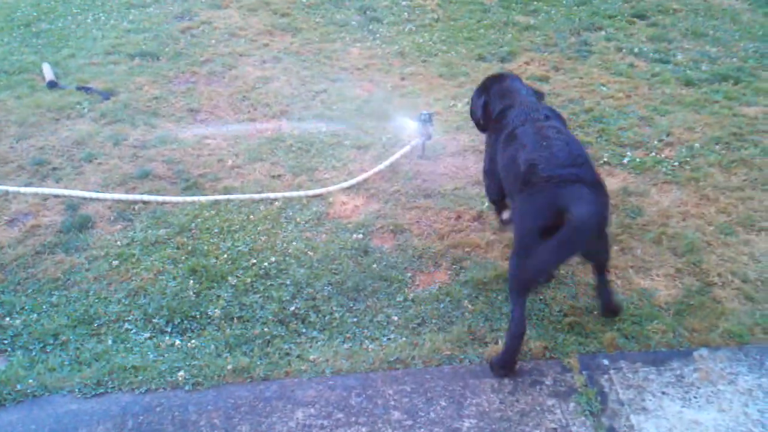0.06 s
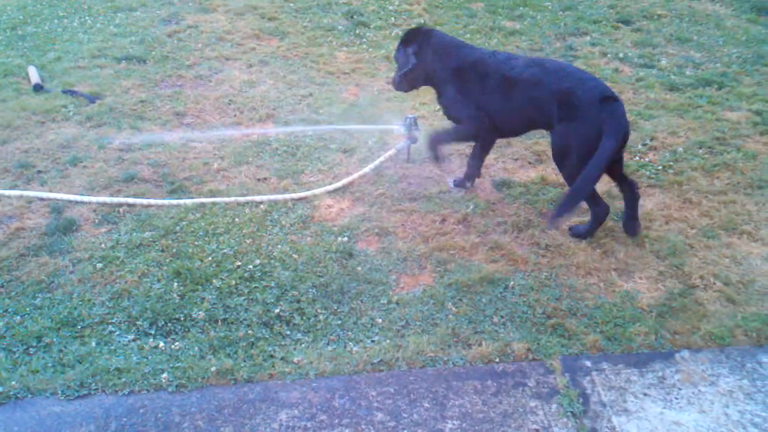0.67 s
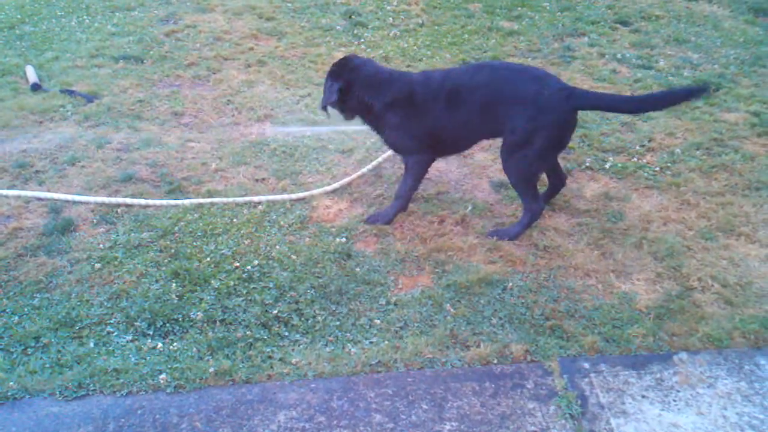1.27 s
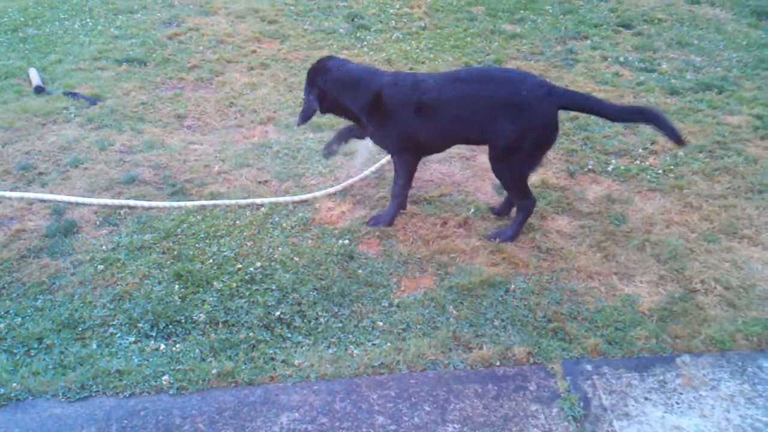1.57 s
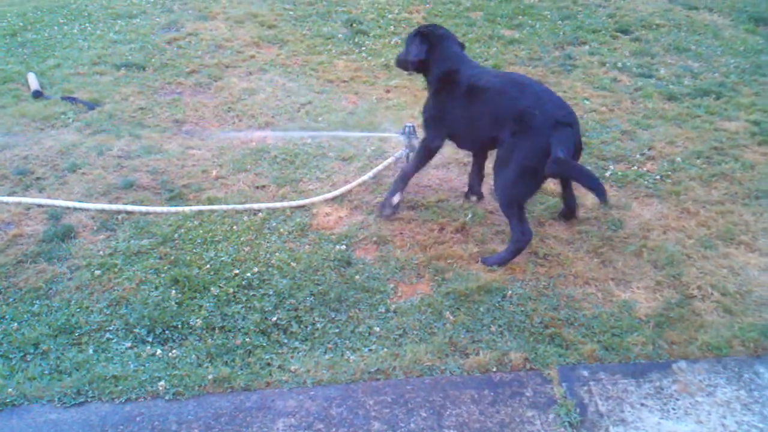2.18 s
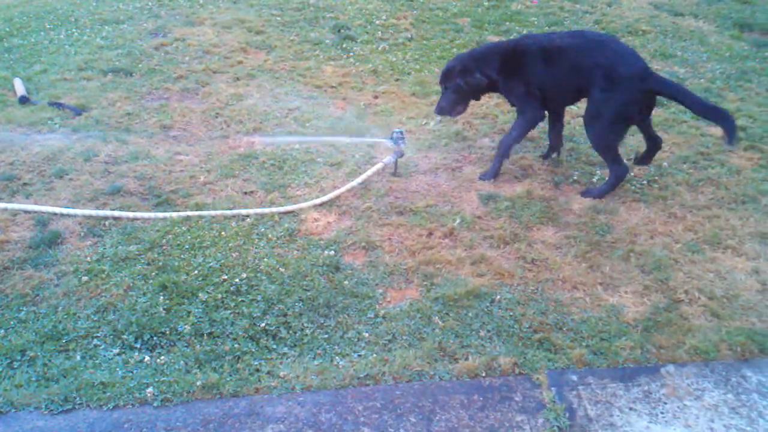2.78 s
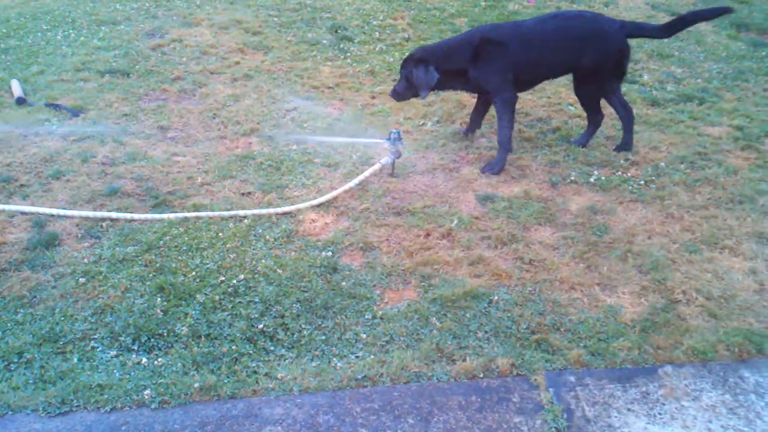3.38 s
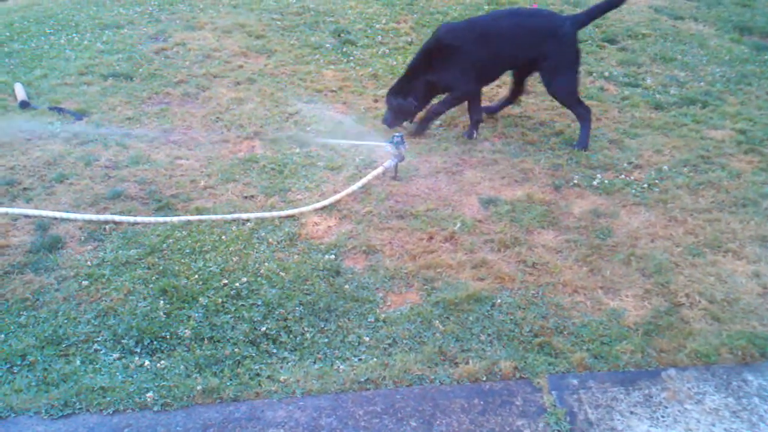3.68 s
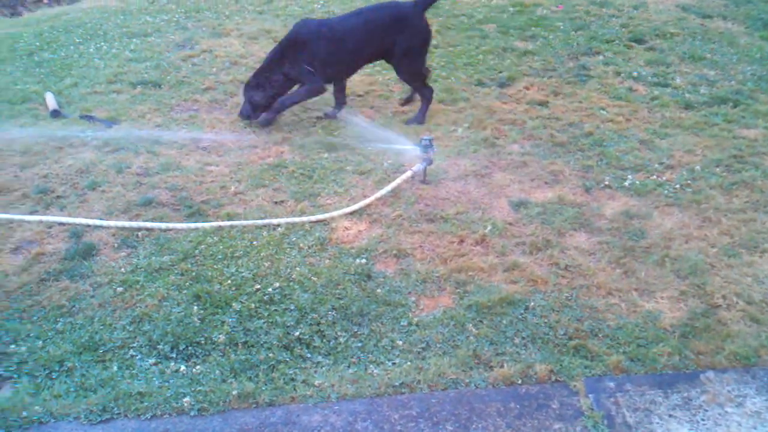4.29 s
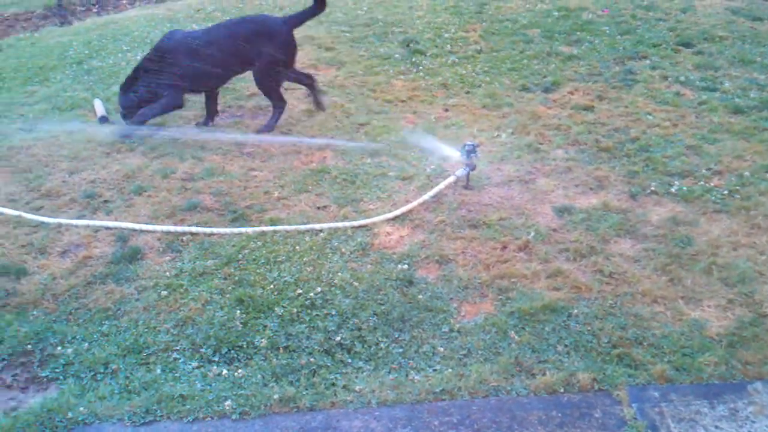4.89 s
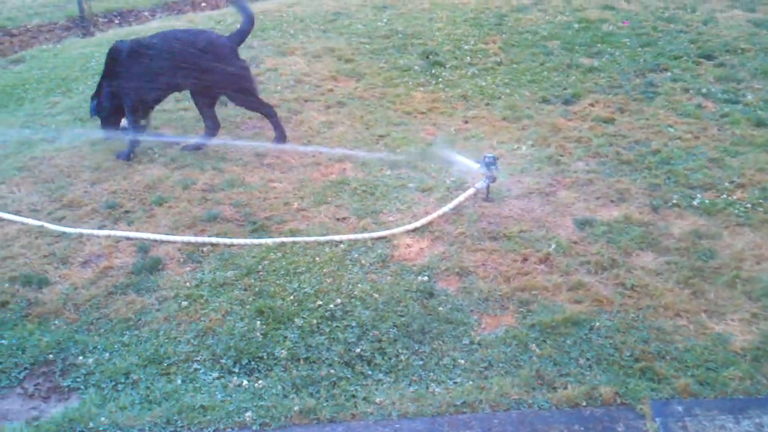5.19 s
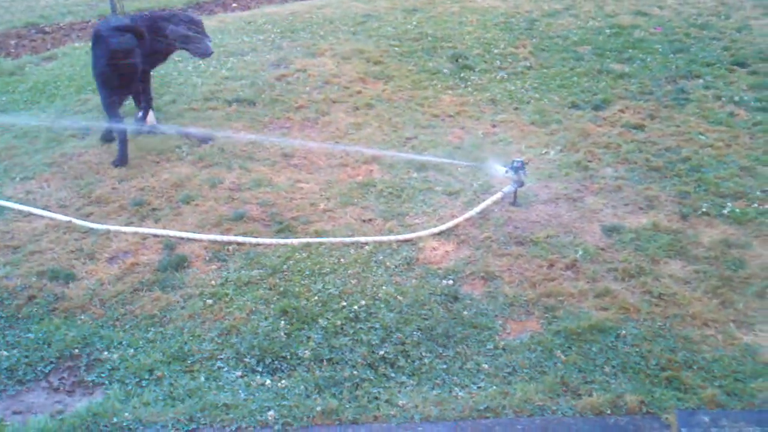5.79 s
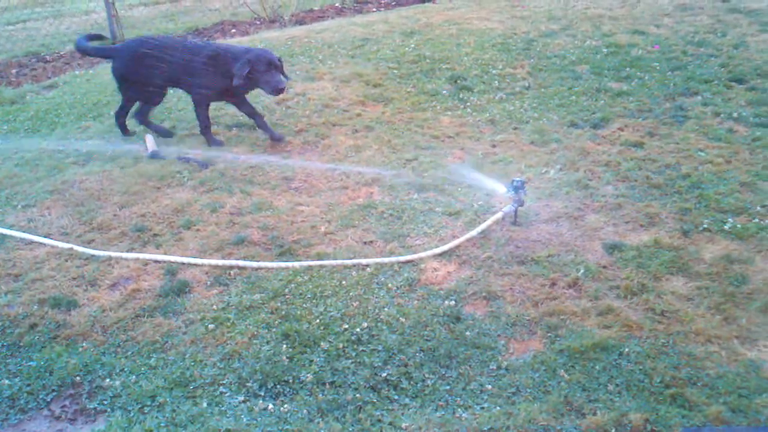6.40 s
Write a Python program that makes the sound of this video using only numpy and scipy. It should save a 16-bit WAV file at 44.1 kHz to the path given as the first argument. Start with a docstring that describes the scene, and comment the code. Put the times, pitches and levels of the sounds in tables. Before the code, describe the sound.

An impact sprinkler ticks on a lawn throughout, each tick a dry click with a slight metallic ring and a short, bright spurt of spray. It starts at about ten ticks a second and slows to a steady six and a half by 2 seconds. At 0.9 seconds the jet splashes briefly on a dog, and again faintly at 1.6, each time skipping a tick. The ticking is softer from about 1 to 2.3 seconds, then gradually regains strength. Wind, louder than the sprinkler, buffets the microphone with low, crackling thumps at the start, heavily from 1 to 2.5 seconds, and again around 3.6. A dull thump comes at 2.9. After 4.5 seconds the wind is gone and the sprinkler is clear, with a few small drop ticks around 5.6 to 5.9. Underneath lie a fine water hiss, faint low outdoor background noise and occasional handling rumble.

```python
"""An impact sprinkler ticks on a lawn: its arm swings into the water jet, clicks, rings the metal head
and throws out a short spray, fast at first, then slowing to a steady 6.5 times a second.
A dog blocks the jet twice, with a paw and with its mouth. The jet hisses, a few fat drops land and
the garden murmurs far away. Wind gusts buffet a hand-held camera, whose two close microphones (mics)
are subtracted from each other to make the stereo sound wider."""
import sys
import numpy as np
from scipy import signal
from scipy.fft import rfft, irfft
from scipy.io import wavfile
from scipy.ndimage import uniform_filter1d, map_coordinates

SR = 44100
rng = np.random.default_rng(int(sys.argv[2]) if len(sys.argv) > 2 else 0)


def unload_audio(sound):
    """Save the sound as a 16-bit wav file, at the path given as the first command line argument."""
    columns = np.transpose(np.atleast_2d(sound))
    # keep every value between -1 and 1, then stretch to whole-number steps
    steps = np.round(np.clip(columns, -1, 1) * 32767)
    wavfile.write(sys.argv[1], SR, steps.astype(np.int16))


N = 293265
TIME = np.arange(N) / SR

# A COLOUR table only says how strong low and high pitches are compared with each other.
# the far-off murmur of the garden: f/Hz, level/dB
GARDEN_COLOUR = [(60, 9), (130, 13), (250, 9.5), (400, 0.5), (800, -2), (1300, -13), (2000, -34),
                 (3500, -30), (6000, -34)]
# how loud the murmur is heard (it dips, swells near 2 s, dips again, then slowly rises): t/s, level/dB
GARDEN_LEVEL = [(0, -49), (.28, -50), (.55, -45.5), (1.06, -46.5), (1.2, -61), (1.8, -50), (2.13, -42.5),
                (2.6, -55.5), (3.3, -51), (3.68, -54), (4.2, -53), (5.1, -50.5), (5.85, -48.5),
                (6.65, -46.5)]
# the rumble of the camera body: f/Hz, level/dB
RUMBLE_COLOUR = [(20, -46), (45, 2.5), (100, 4), (150, 1.5), (300, -16.5), (1000, -54.5)]
# the hand shifts on the camera: peak t/s, level/dB, rise/s, fall/s (each over 10 dB)
HAND_SHIFTS = [(.08, -24, 0.12, 0.12), (.5, -39, 0.42, 0.31), (1.1, -29, 0.17, 0.22),
               (4.55, -44.5, 0.31, 0.15), (6.46, -40, 0.074, 0.13)]
# gusts of wind: peak t/s, strength/dB, rise/s, fall/s (each over 10 dB)
WIND_GUSTS = [(0, -23.5, .03, 0.032), (.1, -22.5, 0.073, 0.2), (.365, -34, 0.011, 0.038),
              (.58, -38, 0.051, 0.079), (.99, -25.5, 0.021, 0.011), (1.115, -19.5, 0.05, 0.027),
              (1.26, -21, 0.12, 0.11), (1.48, -23, 0.075, 0.15), (1.8, -19, 0.14, 0.48),
              (2.0, -15, 0.14, 0.31), (2.28, -21, 0.17, 0.23), (2.555, -19.5, 0.0081, 0.0069),
              (2.675, -25, 0.033, 0.02), (2.97, -31.5, 0.079, 0.032), (3.25, -40, 0.08, 0.15),
              (3.53, -21.5, 0.033, 0.054), (3.6, -15, 0.047, 0.038), (3.67, -17.5, 0.049, 0.047),
              (3.785, -22.5, 0.082, 0.057), (4.03, -30.5, 0.044, 0.034), (4.2, -34.5, 0.073, 0.1),
              (4.46, -34.5, 0.035, 0.064)]
# eddies (swirls of air), large to small: f/Hz, relative level/dB, growth/(dB per gust dB), rate/(1/s)
EDDY_SIZES = [(163, -4.5, 0.88, 600), (303, -3, 1.495, 650), (697, -20, 2.37, 260), (1200, -45, 2.3, 140)]
# single hard hits of wind: t/s, peak level/dB, f/Hz
WIND_HITS = [(.08, -4.5, 256), (.096, -12.5, 317), (.151, -2.5, 264), (.301, -25, 230), (.369, -19.5, 221),
             (.529, -20, 244), (.594, -20, 204), (.663, -29, 230), (.971, -20, 217), (1.021, -3, 221),
             (1.065, -10.5, 190), (1.099, 0, 262), (1.124, -2.5, 195), (1.133, -2.5, 273), (1.15, -9, 300),
             (1.206, -16, 533), (1.212, -11.5, 380), (1.294, -16.5, 640), (1.354, -15.5, 338),
             (1.416, -13, 263), (1.438, -15.5, 315), (1.481, -11, 266), (1.525, -11.5, 267),
             (1.701, -14, 380), (1.844, -6, 323), (1.857, -15, 557), (1.882, -2.5, 300), (1.901, -3, 288),
             (1.927, -22.5, 800), (1.937, -3.5, 293), (1.947, -12, 560), (1.967, -14, 780), (1.992, 0, 218),
             (2.004, -12, 800), (2.036, -6.5, 412), (2.054, -11, 540), (2.061, -7, 323), (2.069, -14, 750),
             (2.176, -8, 337), (2.184, -13.5, 704), (2.217, -15, 710), (2.229, -17, 300),
             (2.249, -17.5, 1170), (2.251, 0, 248), (2.291, -7, 393), (2.344, -10.5, 516),
             (2.405, -23, 547), (2.463, -14, 278), (2.544, -17.5, 322), (2.673, -21, 571),
             (2.972, -19.5, 249), (3.342, -17, 194), (3.525, -6.5, 310), (3.562, -12.5, 520),
             (3.587, -10, 700), (3.598, -2, 524), (3.627, -0.5, 392), (3.673, -16, 580), (3.722, -22, 516),
             (3.78, -22.5, 685), (3.804, -9, 260), (4.154, -20.5, 209), (4.247, -20, 216),
             (4.487, -24, 302)]
# a dull thump on one mic: t/s, level/dB, f/Hz, decay/s
DULL_THUMPS = [(2.888, -6.5, 147, 0.0028)]
# the hiss of the free jet: f/Hz, level/dB
JET_COLOUR = [(1500, 2.5), (2500, -6), (3700, -9.5), (5000, -7.5), (7000, 0.5), (9600, 3.5), (10500, 0),
              (12000, 4), (13900, -2)]
# how loud the jet hisses: t/s, level/dB
HISS_LEVEL = [(0, -48.5), (.55, -49.5), (1.06, -51.5), (1.2, -57), (1.75, -55.5), (2.4, -59.5),
              (3.1, -56.5), (3.45, -54), (3.7, -58), (4.2, -56.5), (4.65, -54.5), (5.0, -54.5), (5.72, -51),
              (6.2, -49), (6.65, -50)]
# fat drops landing nearby: t/s, level/dB, f/Hz
FAT_DROPS = [(5.592, -49, 3070), (5.718, -43, 6800), (5.854, -35, 3220)]
# water hitting the dog: f/Hz, level/dB
DOG_COLOUR = [(300, -11), (1000, -17), (2000, -12), (3500, -14), (5000, -7.5), (7400, -2), (9300, 7),
              (10500, -5), (12000, 2.5), (14000, -10)]
# the dog blocks the jet: t/s, level/dB, length/s, extra level of the first slap/dB
DOG_BLOCKS = [(0.88, -32.5, 0.11, 0.5), (1.554, -45, 0.15, -5)]
# the notes of the metal head: f/Hz, level next to the spray/dB, time to fade by 60 dB/s
HEAD_NOTES = [(2150, -19, .035), (3273, -29, .08), (3661, -30.5, .17), (4520, -17, .045), (6561, -15.5, .1),
              (7687, -17, .07), (9075, -13, .08), (11750, -13, .03)]
# the arm hitting the frame: f/Hz, level/dB
KNOCK_COLOUR = [(600, -5), (1400, -20), (2200, -0.5), (3000, -9.5), (3750, -17.5), (4600, 6), (6000, 8),
                (9000, 14.5), (13500, -4)]
# the jet first meeting the arm: f/Hz, level/dB
SMACK_COLOUR = [(700, -4), (1500, 10), (2200, 11), (3100, 13), (3750, -1), (4600, 24), (7000, 0),
                (13000, 21.5)]
# large drops spat off the arm: f/Hz, level/dB
SPIT_COLOUR = [(1000, -1), (2200, -33), (3100, 10), (3700, -12.5), (4500, -4.5), (7500, 8.5), (10000, 0),
               (12300, 13), (14000, 0)]
# the spray off the arm: f/Hz, level/dB
SPRAY_COLOUR = [(500, -32), (1500, -17.5), (2300, -18.5), (3200, -31.5), (3750, -21), (4500, -11),
                (6000, -6.5), (7400, -5.5), (8600, 2.5), (9850, 1), (10500, -8), (11000, 0), (12400, 0),
                (13000, -6.5), (13900, -8)]
# swings of the arm into the jet:
# t/s, level/dB, time in the jet/s, hardness of the landing/dB, brightness/dB, delay of the landing/s
ARM_SWINGS = [(0.0, -31.5, 0.043, 1, 1, 0.007), (.08, -31.5, 0.05, 0.5, -1.5, 0.016),
              (.177, -33, 0.044, -1, 0, .007), (.268, -33.5, 0.048, 1.5, .5, .012),
              (.37, -32.5, 0.038, -0.5, 0.5, .009), (.474, -32.5, .051, 1.5, 4, 0.014),
              (0.591, -31, 0.043, 1.5, 1, 0.0071), (.707, -32.5, 0.045, 2.5, 3, 0.0083),
              (0.827, -32.5, 0.041, -2, -0.5, .006), (1.086, -37, 0.039, 2, 1, 0.0066),
              (1.221, -45, 0.053, -3, 0, 0.014), (1.364, -45.5, 0.047, 1.5, -6, 0.0064),
              (1.507, -45.5, 0.044, 0, -7.5, 0.011), (1.809, -42.5, 0.047, -2, -4, 0.0063),
              (1.964, -44.5, 0.038, -0.5, -6.5, 0.0077), (2.114, -44.5, 0.049, -4, 0, .01),
              (2.268, -43, 0.041, -2.5, -1, 0.012), (2.426, -40.5, 0.035, 1, 5, 0.0062),
              (2.578, -38.5, 0.034, -1.5, 1, 0.0068), (2.733, -39, 0.037, 1, 2.5, .005),
              (2.882, -38, 0.04, -4, -.5, 0.0099), (3.039, -39, 0.038, 2, 1.5, 0.0061),
              (3.191, -36.5, 0.041, 0, 2.5, 0.0061), (3.345, -37, 0.041, 0, .5, 0.0066),
              (3.498, -38.5, 0.045, 3, 3, 0.0068), (3.648, -42, 0.044, 3, -0.5, .011),
              (3.807, -39, 0.035, -.5, 1.5, 0.0044), (3.956, -41, 0.046, 2.5, 2, 0.0063),
              (4.111, -37.5, 0.034, 1, 1.5, 0.0062), (4.265, -37, 0.036, -3, 0.5, 0.0056),
              (4.413, -40.5, 0.045, -1, -4, .009), (4.571, -37.5, 0.035, -0.5, -2, 0.0051),
              (4.724, -37.5, 0.044, 2, 1, 0.0052), (4.881, -36.5, 0.036, 1.5, 0.5, 0.0038),
              (5.031, -37, 0.041, 1, 0, 0.0064), (5.181, -35.5, 0.045, -2.5, -1.5, 0.0096),
              (5.338, -34.5, 0.042, 3.5, 2, 0.0075), (5.493, -35.5, 0.04, 0, -1.5, 0.008),
              (5.646, -34.5, 0.045, 4.5, .5, 0.0058), (5.8, -31.5, 0.036, 1, 1, 0.005),
              (5.953, -33, 0.039, 3, -2, 0.0096), (6.106, -32, 0.04, -2, 2.5, 0.0085),
              (6.259, -32, 0.04, 4, 1, 0.0088), (6.413, -33, 0.044, 3, 1, .008),
              (6.566, -33.5, 0.037, 0.5, 2, .008)]
# how much of the other mic is subtracted: f/Hz, share (0 to 1)
CROSS_SHARE = [(2700, 1), (3900, .88), (5600, .42), (9000, .24)]

SLAP_WIDTH_S = .005  # how long the water's first slap takes to die down


def gain_of(db):
    """Turns decibels into a number to multiply a sound by."""
    return 10 ** (np.asarray(db) / 20)


def evened(x):
    """Scales x so that its average size (rms) is 1."""
    return x / np.sqrt(np.mean(x ** 2) + 1e-20)


def curve(rows):
    """Joins (time, value) points with straight lines."""
    return np.interp(TIME, *np.transpose(rows))


def coloured(x, colour):
    """Shapes the lows and highs of x with a colour table; the result has average size 1."""
    hz, db = np.transpose(colour)
    bins = np.fft.rfftfreq(N, 1 / SR)
    gains = gain_of(np.interp(np.log(bins + 1), np.log(hz), db))
    return evened(irfft(rfft(x) * gains, N))


def flutter(hz):
    """A smooth random wobble of average size 1, with up to about hz changes a second."""
    slow_time = TIME[::16]
    bins = np.fft.rfftfreq(len(slow_time), slow_time[1])
    slow = irfft(rfft(rng.standard_normal(len(slow_time))) * np.exp(-(bins / hz) ** 2), len(slow_time))
    return np.interp(TIME, slow_time, evened(slow))


def patchy(x, db):
    """Makes x louder and softer in random patches about 400 Hz wide and 30 ms long."""
    grid = signal.stft(x, nperseg=512)[2]  # the sound laid out by pitch and time
    patches = uniform_filter1d(rng.standard_normal(grid.shape[1:]), size=5, axis=0)
    patches = uniform_filter1d(patches, size=6, axis=1)
    return evened(signal.istft(grid * gain_of(db * evened(patches)), nperseg=512)[1][:, :N])


def impacts(per_s, spread_db):
    """Tiny random clicks, different at each mic; more spread makes a few stand out."""
    lands = rng.random((2, N)) < per_s / SR
    sign, size = np.sign(rng.random((2, N)) - .5), rng.exponential(1, (2, N))
    out = np.zeros((2, N))
    out[lands] = sign[lands] * gain_of(spread_db * np.minimum(size[lands], 4))
    return evened(out)


def partly_shared(pair, share):
    """Makes the two mics partly alike: direct sound is the same at both, scattered sound is not."""
    return np.array([pair[0], share * pair[0] + np.sqrt(1 - share ** 2) * pair[1]])


def swells(rows, rest_db):
    """The level in dB of rounded swells that rise out of a resting level."""
    power = gain_of(rest_db) ** 2
    for at, db, rise, fall in rows:
        from_peak = (TIME - at) / np.where(TIME < at, rise, fall)
        power = power + gain_of(db - 10 * from_peak ** 2) ** 2
    return 10 * np.log10(power)


def bursts(rows, rise_s, fall_s, dip_db=0):
    """How much water sprays: a first slap, a dip if asked for, a steady part, then drops in the air."""
    out = np.zeros(N)
    for at, db, length, slap_db, slap_delay in rows:
        near = slice(max(int((at - .03) * SR), 0), int((at + length + .13) * SR))
        t = TIME[near] - at
        enters = (1 + np.tanh(t / rise_s)) / 2
        stays = (1 - np.tanh((t - length) / fall_s)) / 2
        from_slap = (t - slap_delay) / SLAP_WIDTH_S
        slap = gain_of(slap_db * np.exp(-from_slap ** 2) + dip_db * np.exp(-(from_slap - 2.3) ** 2))
        airborne = gain_of(-11.5) * np.exp(-np.maximum(t - length, 0) / .025)
        out[near] += gain_of(db) * enters * (slap * stays + airborne * (1 - stays))
    return out


def garden():
    """A low murmur from far away, which reaches both mics almost alike."""
    noise = rng.standard_normal(N) + .31 * rng.standard_normal((2, N))
    return gain_of(curve(GARDEN_LEVEL)) * coloured(noise, GARDEN_COLOUR)


def handling():
    """The camera body rumbles dully as the hand shifts on it."""
    level_db = swells(HAND_SHIFTS, rest_db=-54.5)
    return gain_of(level_db) * coloured(rng.standard_normal((2, N)), RUMBLE_COLOUR)


def eddy(hz):
    """One swirl of air passes a mic: a spike of pressure between two shallow dips."""
    from_centre = 2 * np.pi * hz * np.arange(-900, 901) / SR / 2.5
    return (1 - 3 * from_centre ** 2) / (1 + from_centre ** 2) ** 3


def wind():
    """Eddies hit each mic separately; small ones grow faster with the gust, so strong gusts crackle."""
    strong_db = -13  # gusts are counted from this strength and stop growing 1 dB below it
    gust_db = np.minimum(swells(WIND_GUSTS, rest_db=-64) - strong_db + 2.3 * flutter(102), -1)
    out = np.zeros((2, N))
    for hz, db, growth, per_s in EDDY_SIZES:
        eddies = signal.oaconvolve(impacts(per_s, spread_db=2.5), eddy(hz)[None], "same", axes=1)
        out += gain_of(strong_db + db + growth * gust_db) * evened(eddies)
    bass_cut = signal.butter(3, 88, "highpass", fs=SR, output="sos")
    return gain_of(-2) * signal.sosfilt(bass_cut, out)


def buffets():
    """A hard eddy hits the mic facing the wind; two more follow, each 12 dB weaker than the last."""
    out = np.zeros((2, N))
    for at, db, hz in WIND_HITS:
        chance = rng.random(4)
        pulse = gain_of(db) * eddy(hz) * np.sign(chance[3] - .5)
        for k in range(3):
            delay = (k + .26 * min(k, 1) * chance[k]) / hz
            start = round((at + delay) * SR) - len(pulse) // 2
            out[1, start:start + len(pulse)] += gain_of(-12 * k) * pulse
    return out


def thump():
    """A very short low note swells and dies away on the second mic."""
    out = np.zeros((2, N))
    for at, db, hz, decay in DULL_THUMPS:
        t = np.maximum(TIME - at, 0)
        out[1] += gain_of(db) * (t / decay) ** 2 * np.exp(-t / decay) * np.sin(2 * np.pi * hz * t)
    return out


def jet_hiss():
    """Thousands of tiny droplets a second blend into the fine hiss of the jet."""
    droplets = partly_shared(impacts(per_s=5000, spread_db=1.5), share=.012)
    level_db = curve(HISS_LEVEL) + .75 * flutter(31)
    return gain_of(level_db) * patchy(coloured(droplets, JET_COLOUR), db=2)


def fat_drops():
    """Each fat drop lands with a short, high tick and a tiny splash."""
    out, noise = np.zeros(N), rng.standard_normal(N)
    for at, db, hz in FAT_DROPS:
        t = np.maximum(TIME - at, 0)
        tick = np.exp(-t / .00088) * np.sin(2 * np.pi * hz * t)
        splash = gain_of(-10) * (t > 0) * np.exp(-t / .0016) * noise
        out += gain_of(db) * (tick + splash)
    return out


def dog_in_jet():
    """The jet breaks into droplets on the dog's paw or mouth."""
    amount = bursts([(*row, SLAP_WIDTH_S) for row in DOG_BLOCKS], rise_s=.0082, fall_s=.017)
    amount *= gain_of(1.84 * flutter(60))
    return amount * coloured(impacts(per_s=9000, spread_db=-.5), DOG_COLOUR)


def head_ring():
    """The arm rings the metal head as it lands, and more softly as it turns back."""
    t, out = np.arange(SR // 4) / SR, np.zeros((2, N + SR))
    hz, note_db, fade_s = np.transpose(HEAD_NOTES)[:, :, None]
    for at, db, in_jet, hard_db, _, lands in ARM_SWINGS:
        for delay, blow_db in (lands, hard_db / 2), (.68 * in_jet, -5):
            start_db = db + blow_db + note_db + 3 * rng.standard_normal(hz.shape)
            detuned = hz * (1 + .003 * rng.standard_normal(hz.shape))  # water on the head shifts it
            waves = np.sin(2 * np.pi * (detuned * t + rng.random((2, len(hz), 1))))
            notes = gain_of(start_db - 60 * t / fade_s) * waves
            out[:, round((at + delay) * SR):][:, :len(t)] += notes.sum(1)
    return out[:, :N]


def arm_knock():
    """The arm lands on the frame with one short, dry click; harder landings are louder."""
    blows, decay_s = np.zeros(N), .0026
    for at, db, _, hard_db, _, lands in ARM_SWINGS:
        blows[round((at + lands - .001) * SR)] = gain_of(db - 2.5 + 1.6 * hard_db)
    fading = signal.lfilter([1], [1, -np.exp(-1 / (decay_s * SR))], blows)
    return fading * patchy(coloured(rng.standard_normal((2, N)), KNOCK_COLOUR), db=7.5)


def jet_smack():
    """The jet first meets the arm with a brief smack of droplets."""
    contacts = [(at + lands - .003, db - 9 + hard_db, .007, 0, 0)
                for at, db, _, hard_db, _, lands in ARM_SWINGS]
    droplets = partly_shared(impacts(per_s=2900, spread_db=3), share=.15)
    return bursts(contacts, rise_s=.0008, fall_s=.005) * patchy(coloured(droplets, SMACK_COLOUR), db=5)


def lawn_echo(pair):
    """Adds the bounce off the lawn; its path changes as the spray swings, so no two spurts sound alike."""
    delay_s = .0004 * (1 + .13 * flutter(7.9))
    echo = np.array([map_coordinates(x, [(TIME - delay_s) * SR], order=3) for x in pair])
    return evened(pair + gain_of(-9) * echo)


def sprinkler_spray():
    """The jet shatters on the arm into a thick, sputtering spray, finer on some swings."""
    spurts = [(at, db, in_jet, .2 + hard_db, lands) for at, db, in_jet, hard_db, _, lands in ARM_SWINGS]
    amount = bursts(spurts, rise_s=.004, fall_s=.008, dip_db=-3.5)  # dips as the jet pushes the arm back
    amount *= gain_of(.3 * flutter(75) + .14 * flutter(300))
    droplets = partly_shared(impacts(per_s=9000, spread_db=.5), share=.031)
    spray = patchy(coloured(droplets, SPRAY_COLOUR), db=3.3)
    large_drops = partly_shared(impacts(per_s=450, spread_db=2.2), share=.37)
    spray = lawn_echo(spray + gain_of(-11.5) * coloured(large_drops, SPIT_COLOUR))
    # the finest drops hiss above 10800 Hz; a bright swing has more of them and less of the rest
    fine = signal.sosfiltfilt(signal.butter(4, 10800, "highpass", fs=SR, output="sos"), spray)
    bright_db = curve([(at + t, db) for at, _, in_jet, _, db, _ in ARM_SWINGS for t in (0, in_jet)])
    bright_db += .72 * flutter(40)
    return amount * (fine * gain_of(bright_db / 2) + (spray - fine) * gain_of(-bright_db / 2))


def scene():
    """Adds up the sounds at the two mics; the second mic catches more wind."""
    sprinkler = sprinkler_spray() + jet_smack() + arm_knock() + head_ring()
    water = (sprinkler + dog_in_jet()) * gain_of([[-.1], [-.3]])
    air = wind() * gain_of([[-2], [1.2]]) + buffets() + thump()
    air = .6 * np.tanh(air / .6)  # the hardest gusts softly overload the mics
    return water + fat_drops() + jet_hiss() + garden() + air + handling()


def record(dry):
    """Each side is one mic minus a late, dull copy of the other; deep bass and top treble are cut."""
    bins = np.fft.rfftfreq(N, 1 / SR)
    share = np.interp(bins, *np.transpose(CROSS_SHARE))
    delay = np.exp(-2j * np.pi * bins * 17 / SR)  # 17 samples late
    wide = dry - irfft(rfft(dry[::-1]) * share * delay, N)
    bass_cut = signal.butter(2, 70, "highpass", fs=SR, output="sos")
    wide = signal.sosfilt(bass_cut, wide) * gain_of([[-.2], [.2]])
    treble_cut = signal.firwin(511, 13980, window=("kaiser", 9), fs=SR)
    return signal.oaconvolve(wide, treble_cut[None], "same", axes=1)


dry = scene()
out = record(dry)
unload_audio(out)
```